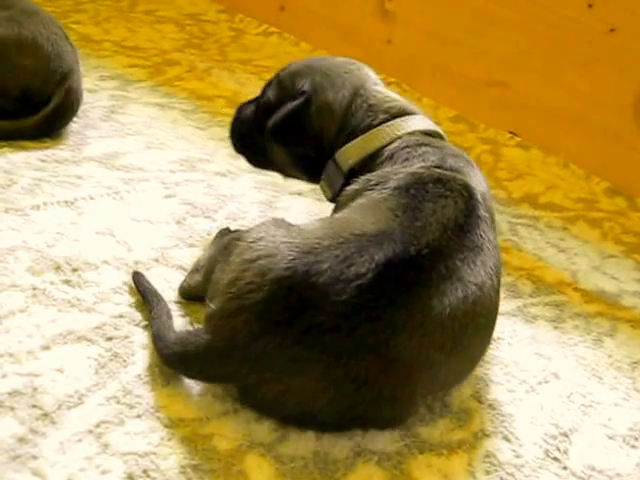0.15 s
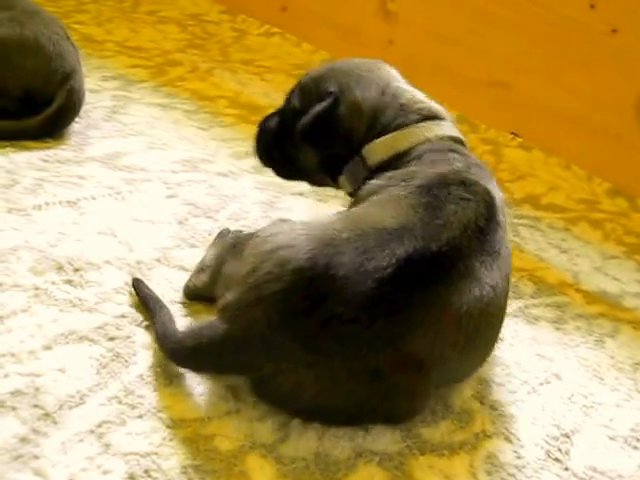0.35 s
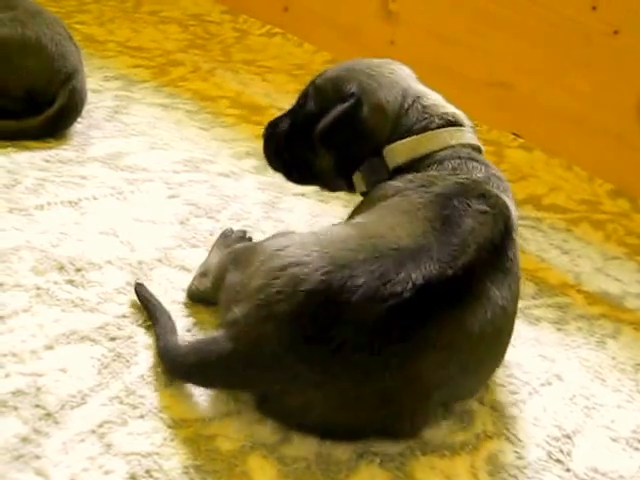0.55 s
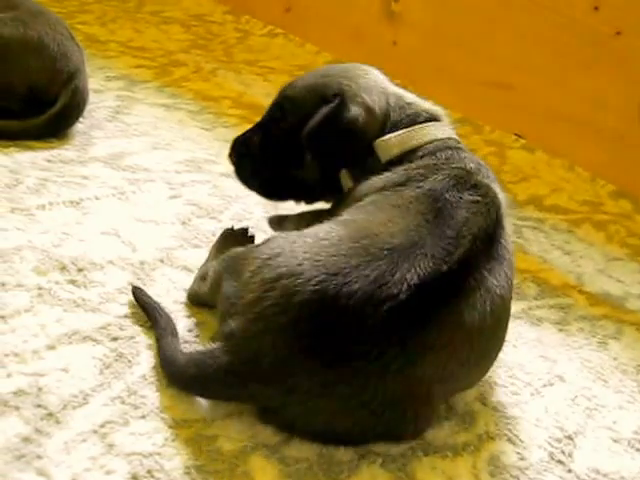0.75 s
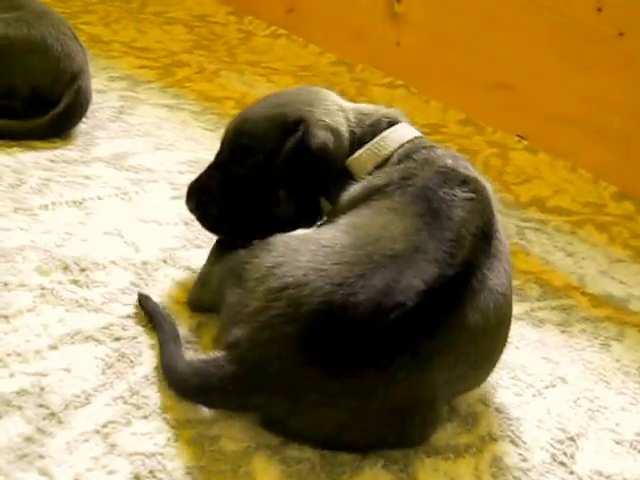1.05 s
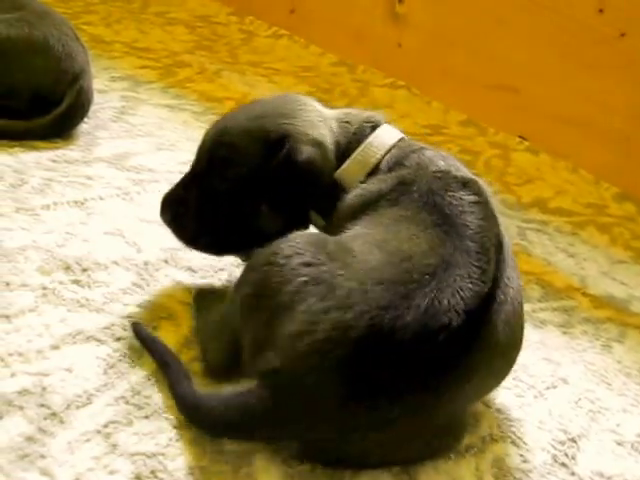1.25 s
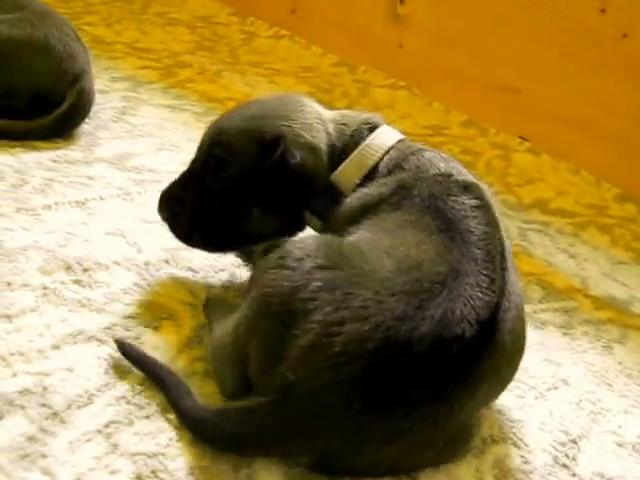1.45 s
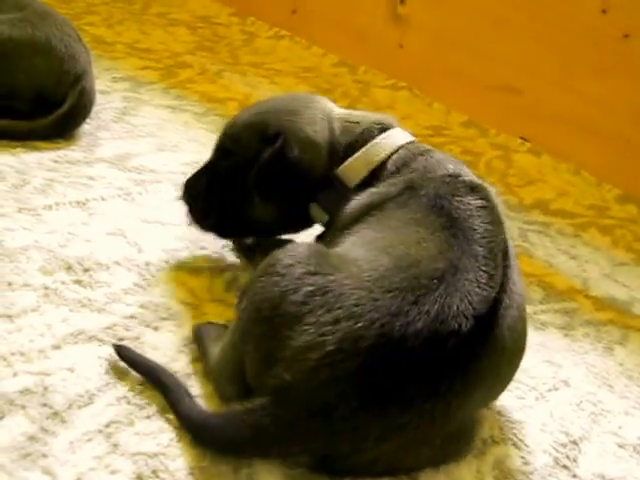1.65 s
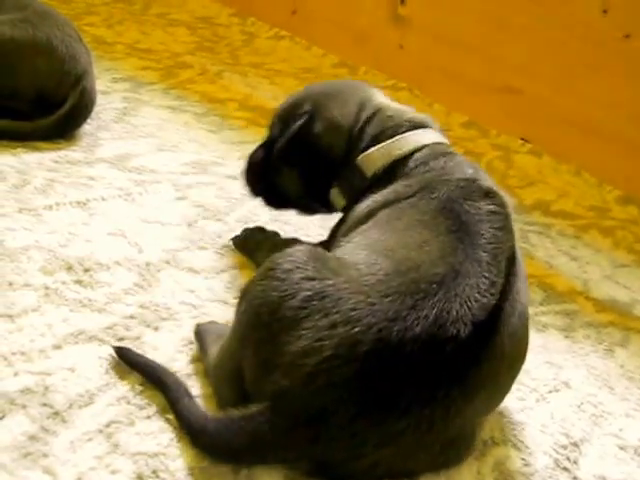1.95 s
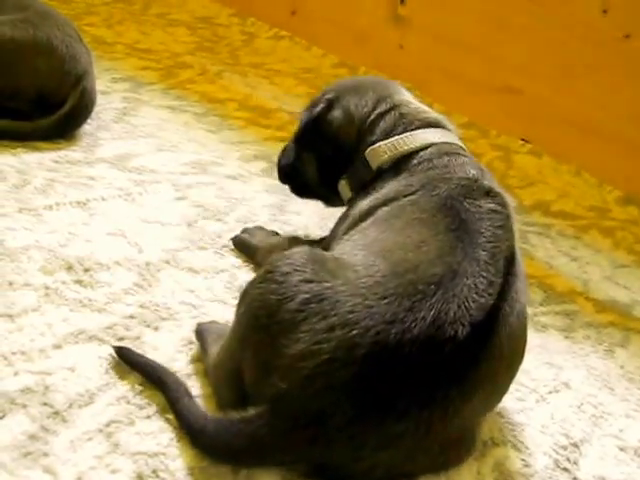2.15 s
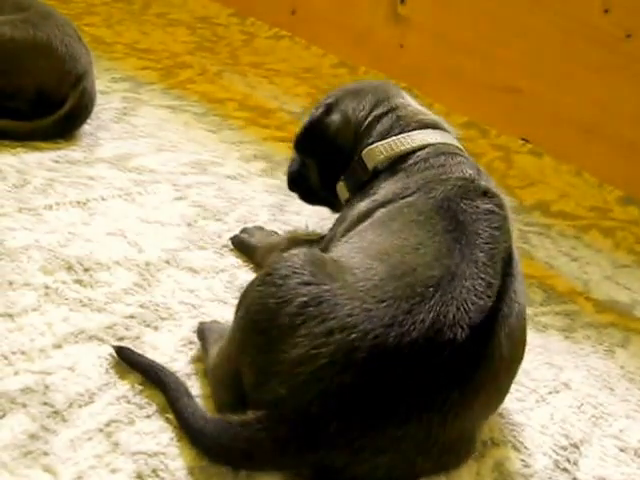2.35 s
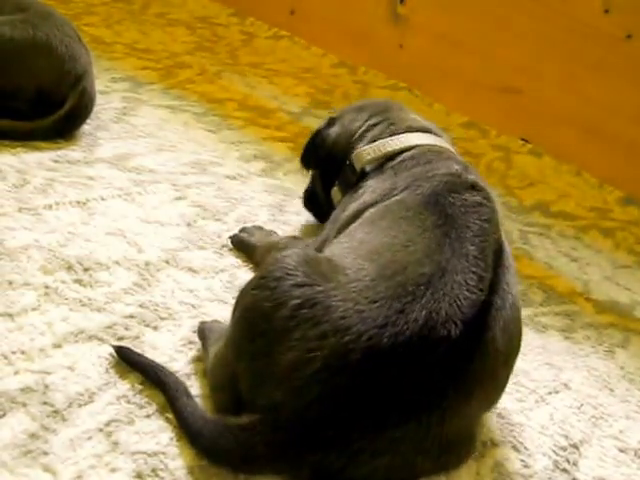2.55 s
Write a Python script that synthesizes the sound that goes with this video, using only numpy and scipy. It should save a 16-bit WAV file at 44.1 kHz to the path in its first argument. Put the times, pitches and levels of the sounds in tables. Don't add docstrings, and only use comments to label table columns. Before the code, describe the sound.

A young puppy whimpers close by in a small hard room over quiet hiss and faint body shifting. A high squeak rises and dips at 0.2 s, another with breathy edges at 0.63. A lower, rising cry comes at 1.03, then a longer one at 1.45 that roughens midway. Claw ticks and a scratch at 1.74, cloth rustles 1.8-1.95, a low creaky whimper at 2.0, brief rustle 2.3, faint last whimper 2.4.

```python
import sys
import numpy as np
from scipy import signal
from scipy.fft import rfft, irfft, next_fast_len
from scipy.io import wavfile
from scipy.ndimage import uniform_filter1d, map_coordinates

SR = 44100
rng = np.random.default_rng(int(sys.argv[2]) if len(sys.argv) > 2 else 0)


def file_out(sig):
    cols = np.atleast_2d(sig).T
    lim = np.clip(cols, -1, 1)
    pcm = np.round(lim * 32767).astype(np.int16)
    wavfile.write(sys.argv[1], SR, pcm)


def gain_from_decibels(decibels):
    exponent = np.asarray(decibels, float) / 20
    return 10 ** exponent


N = 119070
TOP_HZ = 15830
LUMPY_AIR_DB = 2


def unit(x):
    return x / np.sqrt(np.mean(x ** 2) + 1e-20)


def along(points, hz):
    f, v = np.transpose(points)
    return np.interp(np.log(hz + 1), np.log(f + 1), v)


def over_time(points, t):
    return np.interp(t, *np.transpose(points))


def humps(peaks, hz):
    power = 0
    for centre, width, db in peaks:
        detune = (hz * hz - centre * centre) / (hz * width + 1)
        power = power + gain_from_decibels(2 * db) / (1 + detune ** 2) ** 3
    return np.sqrt(power)


def wobble(n, rate):
    knots = rng.standard_normal(int(n * rate / SR) + 4)
    return map_coordinates(knots, [np.arange(n) * rate / SR])


def filtered(x, gain):
    m = next_fast_len(len(x) + 8192)
    return irfft(rfft(x, m) * gain(np.fft.rfftfreq(m, 1 / SR)), m)[:len(x)]


def noise(n, spectrum):
    points = [(8.6, -120)] + list(spectrum) + [(20000, -120)]
    return unit(filtered(rng.standard_normal(n), lambda hz: gain_from_decibels(along(points, hz))))


def add(out, s, x):
    out[round(s * SR):][:len(x)] += x


def swell(spectrum, db, length, lumpy_db):
    u = np.arange(SR // 6) / SR / length
    shape = np.sin(np.pi * np.clip(u, 0, 1) ** 0.85)
    return gain_from_decibels(db + lumpy_db * wobble(len(u), 230)) * shape * noise(len(u), spectrum)


# (frequency [Hz], level [dB per Hz])
ROOM_AIR = [(18, -30.5), (30, -7.5), (377, -3.5), (732, -7), (898, -4), (1080, -5.5), (1350, -9),
            (1860, -9.5), (7000, -17), (9100, -32), (15400, -120)]
# (frequency [Hz], level [dB])
MIC_HISS = [(6000, -45), (8500, 3.5), (9600, 7), (12000, 1), (13500, 1), (15500, 0)]


def hiss():
    air = noise(N, [(22, -22.5)] + ROOM_AIR + [(8000, -60)])
    return gain_from_decibels(-56 + 0.077 * wobble(N, 4.65)) * air + gain_from_decibels(-65.5) * noise(N, MIC_HISS)


# (frequency [Hz], level [dB])
SHUFFLE_COLOUR = [(40, -35), (90, -11.5), (200, 3.5), (400, 0), (700, -47.5)]


def shuffle():
    return gain_from_decibels(-75) * unit(gain_from_decibels(6.2 * wobble(N, 21.8)) * noise(N, SHUFFLE_COLOUR))


# (frequency [Hz], t60 [s])
ROOM_DECAY = [(300, 0.47), (1000, 0.32), (2500, 0.16), (8000, 0.088)]
# (from time [s], room level [dB])
HEAD_TURNS = [
    (0, -16),
    (.6, -10.5),
    (1.0, -12),
    (1.43, -13),
    (1.8, -17.5),
    (2.3, -14),
]


def room(x):
    out = np.zeros(N + SR)
    first_wall_s = 0.01
    for (s, db), (end, _) in zip(HEAD_TURNS, HEAD_TURNS[1:] + [(N / SR, 0)]):
        hz, t, z = signal.stft(rng.standard_normal(SR // 2), SR, nperseg=256)
        decay = gain_from_decibels(-60 * t / along(ROOM_DECAY, hz)[:, None])
        tail = signal.istft(z * decay, SR, nperseg=256)[1]
        answer = gain_from_decibels(db) * tail / np.linalg.norm(tail)
        add(out, s + first_wall_s, signal.fftconvolve(x[round(s * SR):round(end * SR)], answer))
    return out[:N]


# (time [s], level [dB], length [s], centre [Hz])
RUSTLES = [(1.809, -55.5, 0.025, 2300), (1.812, -52.5, 0.025, 894), (1.825, -56, 0.026, 3930),
           (1.827, -51.5, 0.031, 1600), (1.851, -57.5, 0.042, 1500), (1.868, -60, 0.054, 2214),
           (1.882, -53.5, 0.017, 680), (1.895, -54, 0.028, 650), (1.925, -57, 0.04, 2660),
           (1.951, -59, 0.0106, 6050), (2.318, -50.5, 0.01, 1214), (2.317, -51.5, 0.011, 6100),
           (2.327, -59, 0.0215, 1390), (2.33, -61, .01, 4500)]


def rustles(out):
    falls_db = -14.5
    for s, db, length, hz in RUSTLES:
        colour = [(hz / 2, falls_db), (hz, 0), (hz * 2, falls_db)]
        add(out, s, swell(colour, db, length, lumpy_db=3))


# (time [s], level [dB], length [s])
SCRATCHES = [
    (1.612, -59, 0.0061),
    (1.748, -57, 0.018),
]
# (frequency [Hz], level [dB])
SCRATCH_COLOUR = [(6000, -45), (11000, -8), (15500, -3)]


def scratches(out):
    for s, db, length in SCRATCHES:
        add(out, s, swell(SCRATCH_COLOUR, db, length, lumpy_db=LUMPY_AIR_DB))


# (time [s], peak level [dB])
TICKS = [
    (1.7357, -23),
    (1.7382, -32),
]
# (frequency [Hz], level [dB])
CLAW_COLOUR = [(500, -10), (1500, 14), (2800, 20), (3800, 17), (5200, 2), (7000, 22), (10000, 13),
               (15500, 14)]


def ticks(out):
    t = np.arange(1000) / SR
    for s, db in TICKS:
        crack = noise(len(t), CLAW_COLOUR)
        ring = 1.6 * np.sin(2 * np.pi * 3816 * t)
        add(out, s, gain_from_decibels(db - 11.5 - 60 * t / 0.0063) * (crack + ring))


def bedding():
    out = np.zeros(N + SR)
    rustles(out)
    scratches(out)
    ticks(out)
    return out[:N]


# (time [s], level [dB], length [s])
PUFFS = [
    (0.348, -52, 0.036),
    (0.633, -47, 0.06),
    (0.766, -49, 0.0517),
    (1.155, -46, 0.0579),
    (1.651, -48.5, 0.057),
    (2.1, -62, 0.0236),
]
# (frequency [Hz], level [dB])
BREATH_COLOUR = [(1500, 10.5), (3000, -5.5), (4500, -9), (5800, 2.5), (7200, -5), (10500, -7), (13300, -11),
                 (15000, -7)]


def puffs(out):
    for s, db, length in PUFFS:
        add(out, s, swell(BREATH_COLOUR, db, length, lumpy_db=LUMPY_AIR_DB))


def creak(db, hz, length):
    closures_hz, q, scatter_db = 330, 5.5, 2
    out, t = np.zeros(SR // 8), np.arange(SR // 40) / SR
    ring = np.exp(-np.pi * hz / q * t) * np.sin(2 * np.pi * hz * t) * np.tanh(hz * t)
    for i, (late, louder) in enumerate(rng.standard_normal((16, 2))):
        at = (i + 0.2218 * abs(late)) / closures_hz
        arch = np.sin(np.pi * np.clip((at + 0.0032) / (length + 0.0053), 0, 1))
        add(out, at, gain_from_decibels(db + scatter_db * louder) * arch * ring)
    return filtered(out, lambda f: f ** 4 / (f ** 4 + (hz / 2) ** 4))


# (time [s], peak level [dB], ring [Hz], length [s])
CREAKS = [(0.216, -19.5, 1120, 0.016), (0.347, -36, 1970, .012), (0.625, -16, 1137, 0.0091),
          (0.771, -24.5, 1150, 0.024), (0.776, -21.5, 765, 0.019), (1.024, -24, 897, 0.019),
          (1.157, -11, 1094, 0.0063), (1.158, -23, 521, 0.006), (1.445, -24, 904, 0.027),
          (1.669, -27.5, 445, 0.0081), (1.671, -18.5, 950, 0.011), (1.963, -31.5, 603, 0.043),
          (1.976, -25, 1197, 0.029), (2.056, -34, 407, 0.0094), (2.378, -29, 610, 0.0159),
          (2.379, -27.5, 1276, 0.0307), (2.453, -32.5, 576, 0.0075)]


def creaks(out):
    for s, db, hz, length in CREAKS:
        add(out, s, creak(db, hz, length))


# (time [s], level of the halfway partials [dB])
DOUBLING = [
    (1.5, -30),
    (1.535, -16),
    (1.56, 3.5),
    (1.6, -10),
    (1.64, -13),
    (1.67, -40),
]


def folds(t, pitch):
    phase = 2 * np.pi * np.cumsum(pitch) / SR
    k = np.arange(1, 70)[:, None] / 2
    half = gain_from_decibels(np.interp(t, *np.transpose(DOUBLING), left=-80, right=-80))
    size = np.where(k % 1, half * (k > 1), 1)
    waves = size * np.cos(k * phase + k * k / 3) * (k * pitch < TOP_HZ)
    return phase, k * pitch, waves


# (frequency [Hz], level [dB])
THROAT = [(250, -25.5), (450, -10.5), (620, -1.5), (850, -4), (1150, 0), (1500, -8.5), (1900, -8),
          (2700, -13)]


def throat(hz, mouth_hz):
    past_edge = (1 + np.tanh((hz - mouth_hz) / 71 - 1)) / 2
    return gain_from_decibels(along(THROAT + [(5000, -65)], hz) - 24 * past_edge)


# (time [s], centre [Hz], level [dB])
LIP_MOVES = [(.8, 1000, 2.5), (1.04, 1370, 0), (1.09, 1070, 5.5), (1.15, 1522, 1), (1.46, 1100, 1.5),
             (1.49, 970, 4), (1.53, 1140, 3), (1.575, 1290, 2.5), (1.64, 1090, 2.5), (2.0, 874, 8.5),
             (2.024, 1230, -3), (2.045, 1060, 6.5), (2.07, 900, 7), (2.4, 1450, 0), (2.42, 754, 1),
             (2.446, 1090, 8.5)]


def lips(t, hz):
    s, centre, db = np.transpose(LIP_MOVES)
    off_centre = (hz - np.interp(t, s, centre)) / 300
    return gain_from_decibels(np.interp(t, s, db) * np.exp(-off_centre ** 2))


# (centre [Hz], width [Hz], level [dB])
NOSE_RINGS = [(3800, 800, -14), (5800, 1750, -.5)]
# (time [s], level [dB])
NOSE_OPENING = [(.225, 2), (.29, -1.5), (.35, 1.5), (.635, 2.5), (.675, 3), (.70, 2), (.74, 2), (.775, 10),
                (1.03, 0), (1.085, -2.5), (1.15, 3.5), (1.46, -3.5), (1.51, 4.5), (1.545, 0.5),
                (1.585, -1.5), (1.65, 0.5), (2.0, -1), (2.42, 1.5)]
# (time [s], extra hoarseness [dB])
STRAIN = [(.225, 5), (.29, -2), (.35, 4), (.635, 14), (.675, 9), (.69, -3), (.74, -2), (.775, 7), (1.03, 1),
          (1.085, -4), (1.15, -4), (1.455, 13), (1.485, -3), (1.545, 0), (1.585, 12), (1.63, 3), (2.0, 7),
          (2.05, 2)]


def whimper(rows, mouth_hz, rise, nose_db, highest_db, swell_db, upper):
    edge_s = 0.0031
    s, hz, level_db, tilt_db = np.transpose(rows)
    t = np.arange(s[0], s[-1] + edge_s, 1 / SR)
    n = len(t)
    since_middle = t - t.mean()

    def smooth(v):
        return uniform_filter1d(np.interp(t, s, v), size=300, mode="nearest")

    pitch = smooth(hz) * (1 + 0.003 * wobble(n, 227.5))
    phase, partial_hz, waves = folds(t, pitch)
    drift = np.array([wobble(n, 34.4) for _ in waves])
    strain_db = over_time(STRAIN, t)
    hoarse = gain_from_decibels(strain_db + 8 * np.log2(1000 / pitch))
    gated = (1 + np.cos(phase)) * rng.standard_normal((2, n))

    tilt = gain_from_decibels(smooth(tilt_db) * np.log2(np.minimum(partial_hz, mouth_hz) / 1000))
    uneven_db = np.where(partial_hz < mouth_hz, 1.5, 3.5)
    low = throat(partial_hz, mouth_hz + rise * since_middle) * tilt
    low = low * lips(t, partial_hz) * gain_from_decibels(uneven_db * drift)
    whole_rms = np.sqrt(np.sum(low[1::2] ** 2, 0) / 2)
    husk = unit(filtered(gated[0], lambda f: throat(f, mouth_hz)))
    body = np.sum(waves * low, 0) / whole_rms + gain_from_decibels(-33) * hoarse * husk

    rings = NOSE_RINGS + [upper, (14700, 1400, highest_db)]
    main_hz = NOSE_RINGS[1][0]
    clean = waves * gain_from_decibels(4 * drift) * humps(rings, partial_hz) / np.maximum(partial_hz / main_hz, 1)
    breath = filtered(gated[1], lambda f: humps(rings, f) * gain_from_decibels(3 * np.log2((f + 1) / main_hz)))
    ring = unit(np.sum(clean, 0)) * gain_from_decibels(-np.maximum(strain_db, 0) / 2)
    ring = ring + gain_from_decibels(-12) * hoarse * unit(breath)

    level = smooth(level_db)
    ring_db = nose_db + over_time(NOSE_OPENING, t) + 0.61 * (level - level.mean()) + swell_db * since_middle
    edge = np.clip(np.minimum(t - t[0], t[-1] - t) / edge_s, 0, 1)
    shimmer = gain_from_decibels(0.8 * wobble(n, 120.13))
    return edge * shimmer * (gain_from_decibels(level) * body + gain_from_decibels(ring_db) * ring)


# (time [s], pitch [Hz], level [dB], mouth tilt [dB per octave])
HIGH_SQUEAK = [(0.221, 842, -40, 8), (0.238, 885, -23.5, -7.5), (.252, 942, -32.5, 6.5),
               (.268, 1100, -21, -1), (0.282, 1222, -18.5, 4), (0.296, 1281, -20, 0.5),
               (.328, 1163, -19.5, -1), (0.351, 1137, -23, 8), (0.358, 996, -27.5, -12)]
SECOND_SQUEAK = [(.63, 694, -34.5, -11.5), (0.652, 756.3, -39.5, 11), (.668, 882.4, -22.5, -3),
                 (.682, 972.5, -33.5, -9.5), (0.7, 1048, -21.5, -8.5), (0.725, 1012, -29.5, -6),
                 (0.741, 851.5, -21.5, -6), (0.766, 811.7, -30, 8), (.778, 764.5, -30, 0)]
LOWER_CRY = [(1.028, 466, -49, 1.8), (1.037, 473.1, -30.5, 1.2), (1.062, 509.8, -26, 2.5),
             (1.078, 523.3, -21, 1.6), (1.108, 600.7, -21, 0.98), (1.128, 639.6, -25, 2),
             (1.147, 650, -25.5, 4), (1.159, 630.4, -25.5, 1.4), (1.168, 600, -43, 1.4)]
LONG_CRY = [(1.452, 578.5, -38, 1), (1.478, 464.7, -27.5, 1.13), (1.498, 490.8, -27, 4.8),
            (1.528, 553, -26, 3.4), (1.544, 588.5, -30.5, 1.16), (1.576, 528.7, -31, 2.2),
            (1.62, 548.1, -24, 3.9), (1.654, 534.4, -23, 4.1), (1.675, 506, -33.5, 1.5)]
LOW_WHIMPER = [(1.986, 434, -43, -13), (2.005, 438.8, -31.5, -4.5), (2.024, 398, -31, 6.5),
               (2.046, 443, -26.5, -1), (2.069, 458.3, -24, 4), (2.086, 440, -25, -3.5),
               (2.095, 393.2, -39.5, 12)]
LAST_WHIMPER = [(2.388, 432, -53.5, -32), (2.405, 384.6, -34.5, -1.5), (2.424, 357, -35.5, -3.5),
                (2.446, 380, -28.5, -5), (2.46, 351, -55.5, 1)]
# (top of the mouth band [Hz], its rise [Hz per s], nasal ring [dB],
# highest ring under it [dB], ring swell [dB per s])
MOUTHS = [(2037, 102, -51.5, -22, 18), (2120, -100, -53, -37, 6), (1970, 2500, -48, -11, 43.5),
          (1850, 300, -55.5, -25, -5), (1560, 100, -60, -23, 44), (1820, 100, -71, -12, 42)]
# (centre [Hz], width [Hz], level [dB])
UPPER_RINGS = [(10050, 1800, 4.5), (10530, 3600, -5.5), (11400, 3400, -7.5), (11290, 4500, -9),
               (10740, 4500, -7.5), (10700, 3200, 0)]


def puppy():
    out = np.zeros(N + SR)
    puffs(out)
    creaks(out)
    calls = (HIGH_SQUEAK, SECOND_SQUEAK, LOWER_CRY, LONG_CRY, LOW_WHIMPER, LAST_WHIMPER)
    for rows, mouth, upper in zip(calls, MOUTHS, UPPER_RINGS):
        add(out, rows[0][0], whimper(rows, *mouth, upper))
    return out[:N]


def scene():
    near = bedding() + puppy()
    return (hiss() + shuffle() + room(near) + near)[None]


def low_pass(x):
    return signal.sosfilt(signal.butter(12, 16520, fs=SR, output="sos"), x)


def record(dry):
    dip_hz, dip_wide_hz = 7860, 1340

    def housing(f):
        return (f < TOP_HZ) * np.abs(f - dip_hz) / np.hypot(f - dip_hz, dip_wide_hz / 2)

    return low_pass(filtered(dry[0], housing)[None])


dry = scene()
out = record(dry)
file_out(out)
```